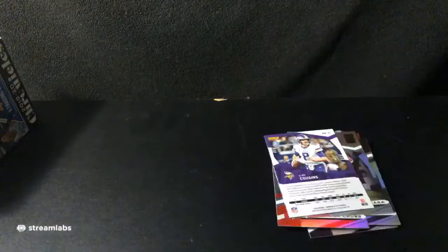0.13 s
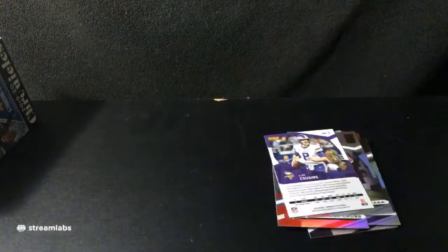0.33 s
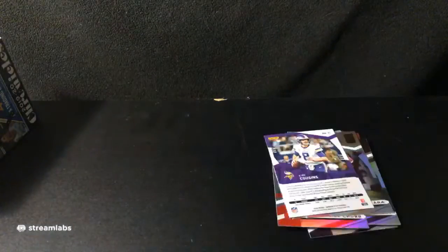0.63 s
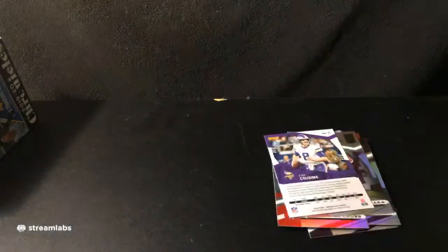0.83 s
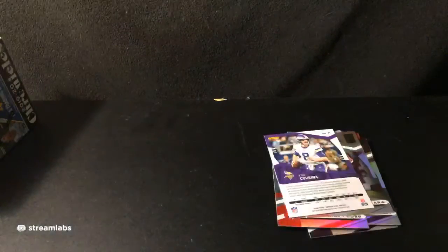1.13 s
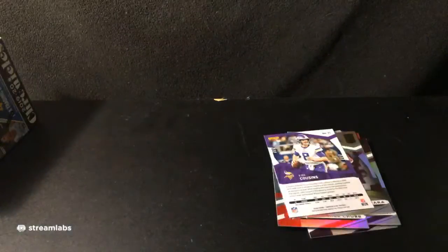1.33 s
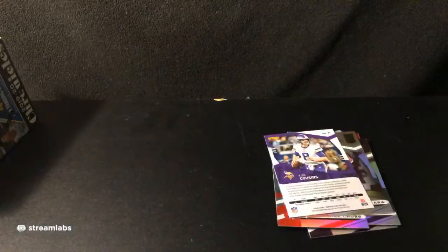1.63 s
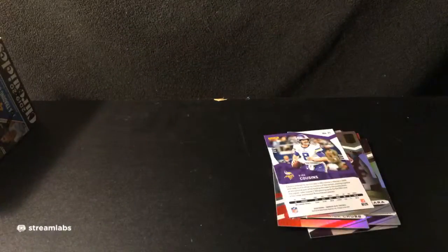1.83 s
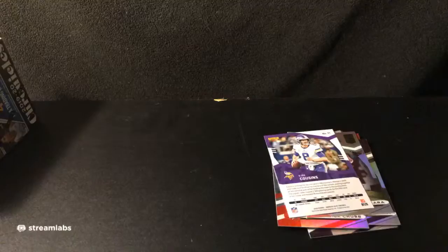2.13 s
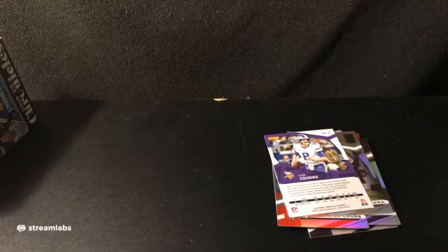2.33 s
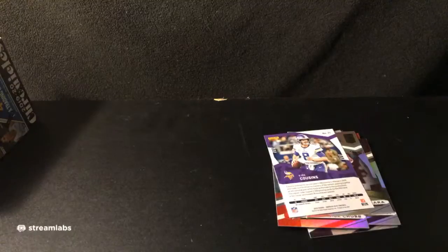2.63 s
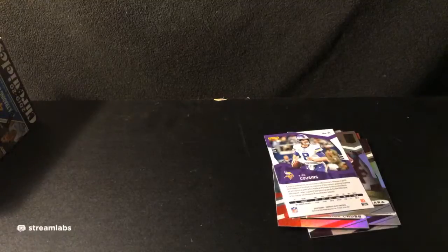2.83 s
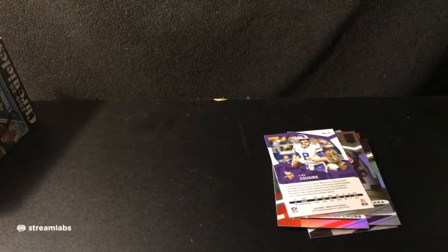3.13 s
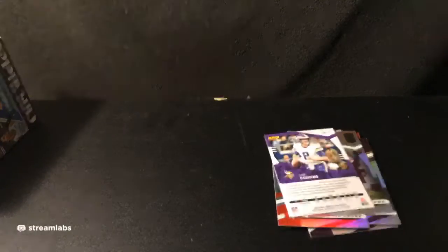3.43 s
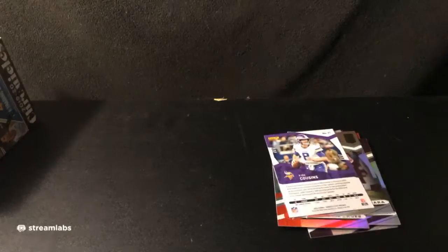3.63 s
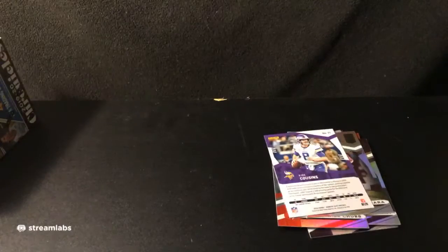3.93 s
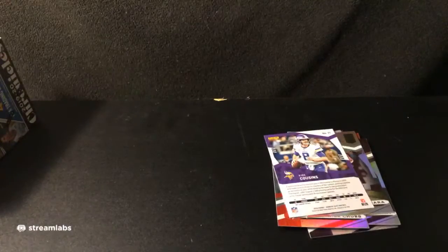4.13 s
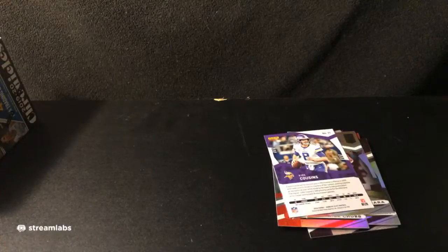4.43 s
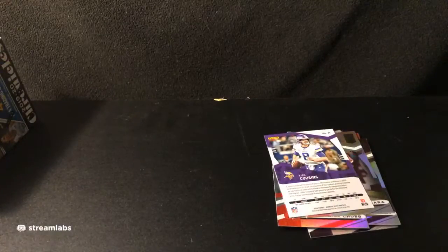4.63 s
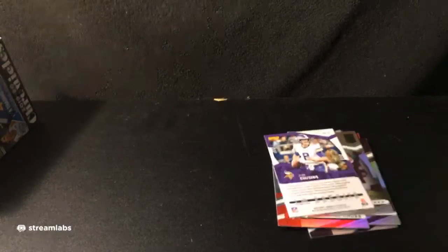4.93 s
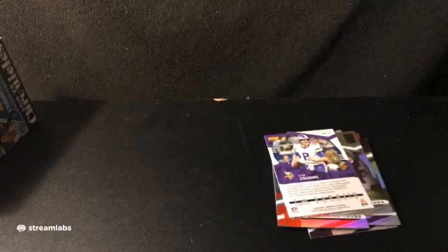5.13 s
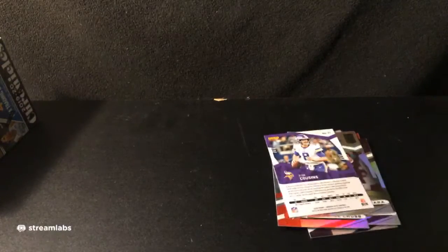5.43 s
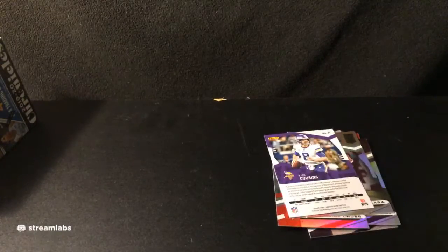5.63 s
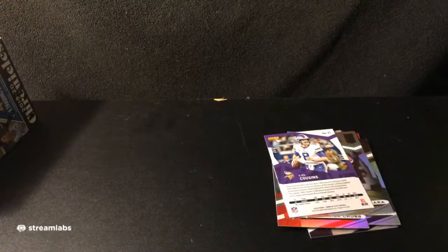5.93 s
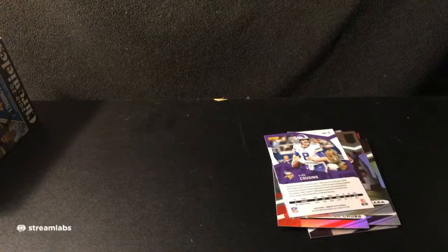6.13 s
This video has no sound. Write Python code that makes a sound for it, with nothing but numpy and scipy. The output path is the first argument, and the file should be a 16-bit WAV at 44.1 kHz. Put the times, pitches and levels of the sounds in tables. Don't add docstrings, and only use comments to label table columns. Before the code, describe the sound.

A hollow box clacks down on a table, then three heavy, widely spaced knuckle thumps land over a faint steady hiss.

```python
import sys
import numpy as np
from scipy import signal
from scipy.fft import rfft, irfft, next_fast_len
from scipy.io import wavfile
from scipy.ndimage import map_coordinates

SR = 44100
rng = np.random.default_rng(int(sys.argv[2]) if len(sys.argv) > 2 else 0)


def linear_from_db(decibels):
    return 10 ** (np.asarray(decibels, float) / 20)


def int16_out(signal):
    q = np.round(np.clip(np.atleast_2d(signal).T, -1, 1) * 32767)
    wavfile.write(sys.argv[1], SR, q.astype(np.int16))


N = 276948


def filtered(x, response):
    m = next_fast_len(len(x) + 8192)
    return irfft(rfft(x, m) * response(np.fft.rfftfreq(m, 1 / SR)), m)[:len(x)]


def unit(x):
    return x / np.sqrt(np.mean(x ** 2) + 1e-20)


def resonance(f, hz, width_hz):
    return 1j * f * width_hz / (hz * hz - f * f + 1j * f * width_hz)


def add(track, s, sound):
    part = track[round(s * SR):][:len(sound)]
    part += sound[:len(part)]


def hiss():
    # frequency in Hz, relative density in dB.
    noise_curve = [(15, -49.5), (30, -25.5), (60, -14.5), (130, -8), (1400, -10), (4500, -18.5),
                   (9500, -31), (12000, -60)]
    level_db, drift_db, drift_rate_hz = -46.5, 0.25, 4
    curve_hz, curve_db = np.transpose(noise_curve)

    def response(f):
        spectrum = linear_from_db(np.interp(np.log(f + 1), np.log(curve_hz + 1), curve_db))
        capsule = 1 + 4.49 * resonance(f, 2626, width_hz=550)
        return spectrum * capsule

    noise = filtered(rng.standard_normal(N), response)
    drift = map_coordinates(rng.standard_normal(40), [np.arange(N) * drift_rate_hz / SR])
    return linear_from_db(level_db + drift_db * drift) * unit(noise)


def creak():
    # time in seconds, frequency in Hz, level in dB.
    joint_glide = [(4.53, 580, -85), (4.565, 585, -53), (4.6, 610, -59), (4.64, 650, -58), (4.66, 660, -85)]
    s, glide_hz, glide_db = np.transpose(joint_glide)
    t = np.arange(N) / SR
    phase = 2 * np.pi * np.cumsum(np.interp(t, s, glide_hz)) / SR
    return linear_from_db(np.interp(t, s, glide_db, -140, -140)) * np.sin(phase)


def snaps():
    # start in seconds, level in dB, centre frequency in Hz, width in Hz.
    puffs = [
        (.879, -24, 2200, 600),
        (.8885, -27, 1680, 300),
        (2.1462, -29, 3700, 900),
        (2.1462, -35, 5200, 1700),
        (3.4642, -33, 3900, 1000),
        (4.9655, -39, 4800, 2000),
        (4.9656, -42, 7500, 4000),
    ]
    out, t = np.zeros(N), np.arange(SR // 100) / SR
    for s, db, hz, width_hz in puffs:
        puff = filtered(rng.standard_normal(len(t)), lambda f: resonance(f, hz, width_hz) ** 2)
        onset = 1 - np.exp(-t / .0003)
        add(out, s, linear_from_db(db - 60 * t / .006) * onset * unit(puff))
    return out


def box():
    corner_times = [
        .8623,
        .8656,
        .8743,
    ]
    # frequency in Hz, t60 in seconds,
    # then the amplitude of swing given by the first, second and third corner.
    box_modes = [(38, 0.43, 0.0069, 0.0054, .004), (88.7, .12, .01, -.011, .039),
                 (197, .21, -.069, -0.0034, 0.086), (231, 0.12, 0.16, -0.04, -0.38),
                 (364, .024, -0.085, 0.0076, -0.22), (500, 0.051, 0.016, -.02, 0.023),
                 (800, 0.043, -0.011, -0.017, -.02), (671, 0.075, 0.14, -0.044, 0.067),
                 (945, .016, -0.19, 0.17, 0.1), (1150, 0.025, .01, 0.05, -0.072),
                 (1662, .06, .001, .001, 0.01)]
    rest_s = .8947
    panel_loss_db = 6
    out, t = np.zeros(N), np.arange(SR // 2) / SR
    onset = 1 - np.exp(-t / 0.0018)
    for corner, s in enumerate(corner_times):
        choke_db = -60 * np.maximum(s + t - rest_s, 0) / .025
        for hz, t60, *swing in box_modes:
            if hz > 500:
                loss_db = choke_db
            else:
                loss_db = np.maximum(choke_db, -panel_loss_db * (hz > 210))
            fade = linear_from_db(-60 * t / t60 + loss_db) * onset
            add(out, s, swing[corner] * fade * np.sin(2 * np.pi * hz * t))
    return out


def blow(thud_db, thud_hz, thud_width_hz, rap_db, tick_db):
    # frequency in Hz, width in Hz, share of the direct wave.
    top_modes = [
        (132, 75, 5),
        (1238, 457, -.735),
    ]
    # delay in seconds, share of the direct wave.
    edge_returns = [
        (.0012, -.15),
        (.0029, -.16),
    ]
    spread = 1.141
    shear_hz = 12540
    grain_hz = 3000
    f = np.fft.rfftfreq(8192, 1 / SR)

    def late(s):
        return np.exp(-2j * np.pi * f * s)

    thud = linear_from_db(thud_db) * resonance(f, thud_hz, thud_width_hz) ** 4.725

    bone = tick_db > 0
    contact_hz = 1550 if bone else 800
    drive = 1 if bone else .1
    wood = 1 + sum(share * drive * resonance(f, hz, width_hz) for hz, width_hz, share in top_modes)
    returns = 1 + sum(share * late(s) for s, share in edge_returns)
    rise = 1j * f / 237 / (1 + 1j * f / 237)
    contact = rise ** 2 / (1 + 1j * f / contact_hz) ** 4
    rap = linear_from_db(rap_db) * wood * returns * contact / np.sqrt(1 + (f / grain_hz) ** 8)

    opening_hz = 12 * max(tick_db - 9.6, 0)
    tick = linear_from_db(tick_db) * resonance(f, 2784 + opening_hz, 493 + 3 * opening_hz) ** 2
    tick = tick * late(-.00017) / np.sqrt(1 + (f / (grain_hz + 600)) ** 8)

    dispersion = np.exp(-1j * spread * np.sqrt(f + f * f / shear_hz))
    return irfft((thud - rap + tick) * dispersion)


def contacts():
    # start in seconds, force in dB, flight to the rebound in seconds.
    knocks = [
        (2.14385, 52, .07105),
        (3.46181, 40.7, .0805),
        (4.96303, 41.9, .0657),
    ]
    # start in seconds, thud in dB, thud in Hz, rap in dB.
    touches = [
        (2.2965, 7, 105, -9),
        (3.4705, 9, 70, 5),
    ]
    flesh_tick_db = -30
    rows = [(s, db, hz, 190, rap_db, flesh_tick_db) for s, db, hz, rap_db in touches]
    for s, db, flight in knocks:
        over = db - 41
        thud_hz = 73.3 + .33 * over
        thud_width_hz = 98.5 + 1.5 * over
        rap_db = 17.5 + 1.14 * over
        tick_db = 9.6 + .42 * over
        rows.append((s, db, thud_hz, thud_width_hz, rap_db, tick_db))
        rows.append((s + flight, db - 27.5, 73, 132, rap_db - 19.5, flesh_tick_db))
    return rows


def knuckles():
    # start in seconds, thud in dB, thud in Hz.
    leans = [
        (2.183, 14, 80),
        (3.508, 10, 75),
        (2.835, 0, 55),
        (3.22, -2.5, 55),
        (4.015, 1, 60),
        (4.045, 1, 52),
        (4.075, -3, 55),
        (6.245, -3, 60),
    ]
    out, t = np.zeros(N), np.arange(SR // 10) / SR
    onset = 1 - np.exp(-t / 0.0015)
    for s, thud_db, thud_hz, thud_width_hz, rap_db, tick_db in contacts():
        add(out, s, blow(thud_db, thud_hz, thud_width_hz, rap_db, tick_db))
        scatter = filtered(rng.standard_normal(len(t)), lambda f: resonance(f, 420, width_hz=480) ** 2)
        add(out, s + .005, linear_from_db(rap_db - 53.5 - 60 * t / 0.05) * onset * unit(scatter))
    for s, db, hz in leans:
        add(out, s, blow(db, hz, 90, db - 39, -61))
    return out


def scene():
    return (hiss() + creak() + snaps() + box() + knuckles())[None]


def treble_gate(x):
    # frequency in Hz, threshold as a share of the band's median power.
    gate_curve = [(3500, 0), (5500, .58), (8700, .72), (9200, 1.05), (9500, 1.8), (9700, 50)]
    bins = 6
    frame = dict(window=("tukey", .5), nperseg=2816, noverlap=768)
    hz, _, z = signal.stft(x, SR, **frame)
    band = np.arange(len(hz)) // bins
    power = np.add.reduceat(np.abs(z) ** 2, np.arange(0, len(hz), bins), axis=0)[band]
    share = np.interp(hz, *np.transpose(gate_curve))[:, None]
    threshold = share * np.median(power, axis=1, keepdims=True)
    return signal.istft(z * (power > threshold), SR, **frame)[1][:N]


def roll_off(x):
    return signal.sosfilt(signal.butter(12, 9670, fs=SR, output="sos"), x)


def record(dry):
    gated = treble_gate(dry[0])[None]
    return roll_off(np.clip(gated, -1, 1))


dry = scene()
out = record(dry)
int16_out(out)
```